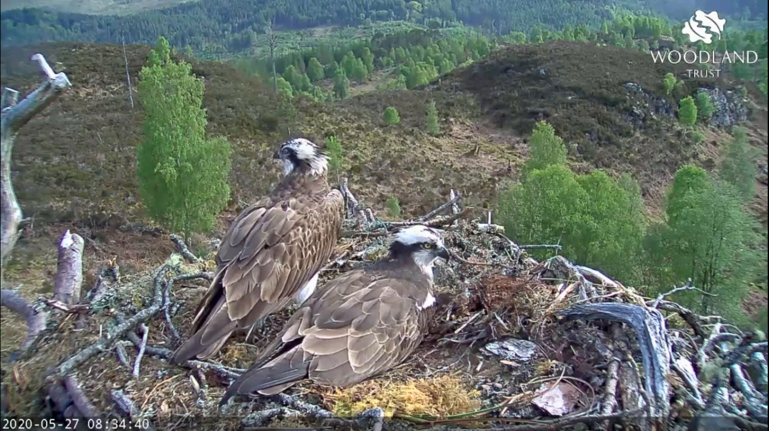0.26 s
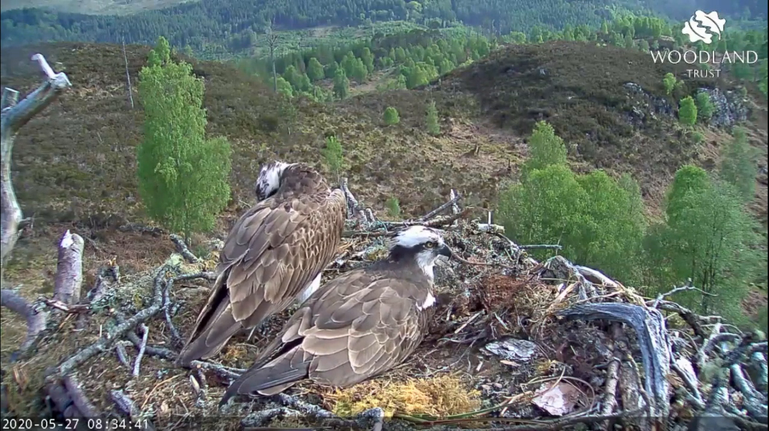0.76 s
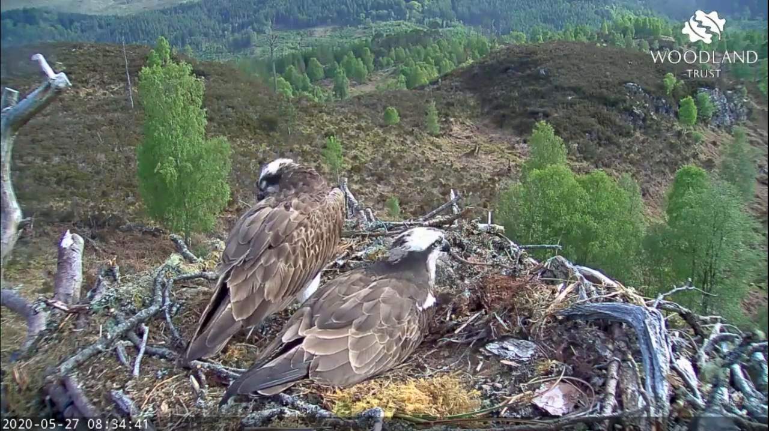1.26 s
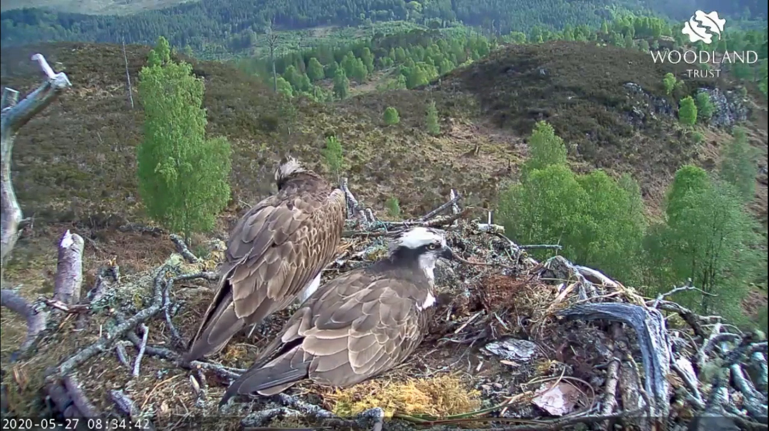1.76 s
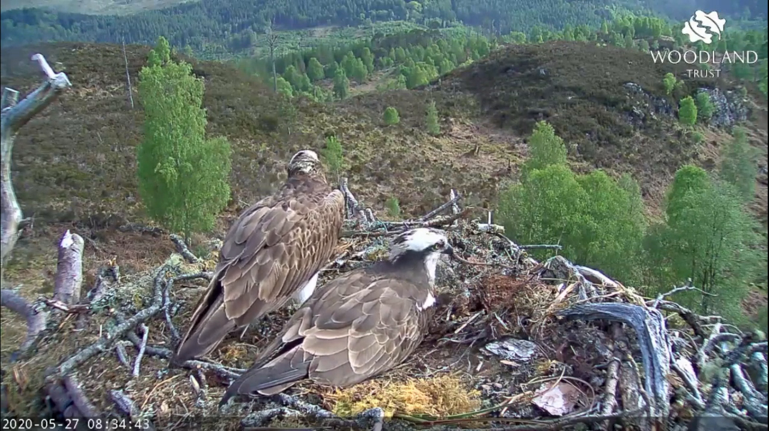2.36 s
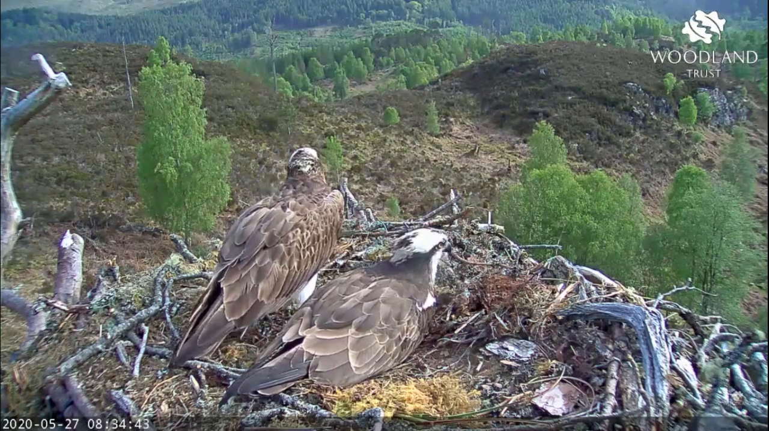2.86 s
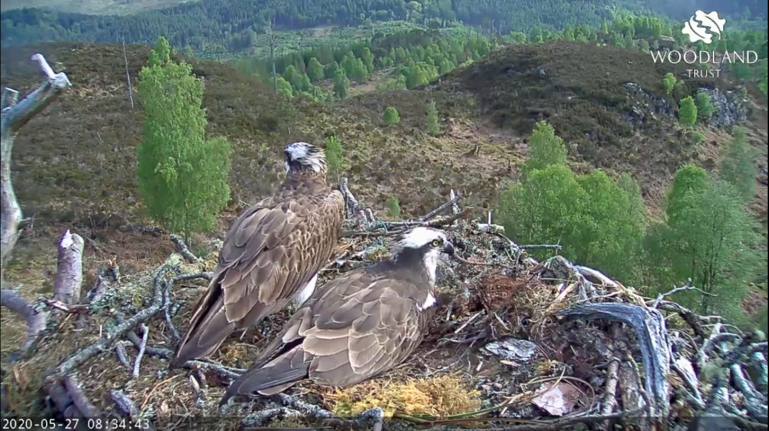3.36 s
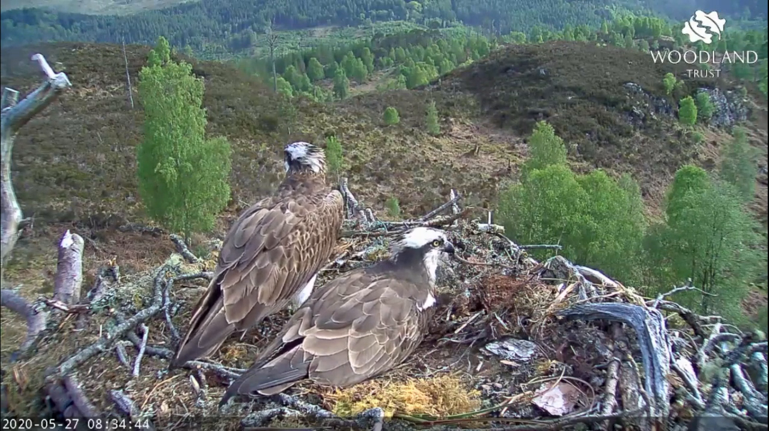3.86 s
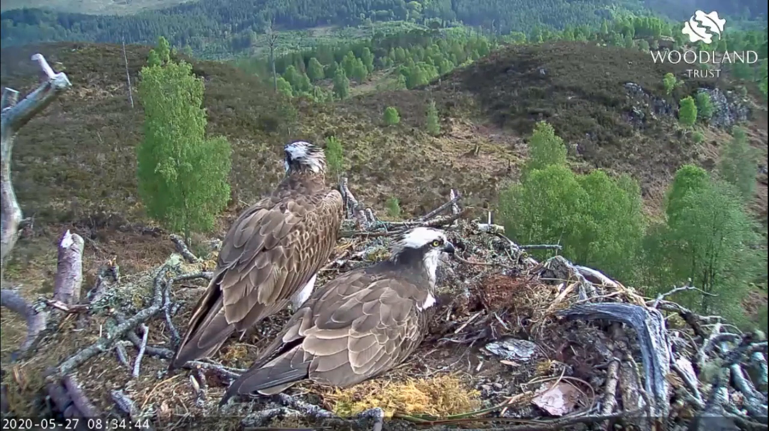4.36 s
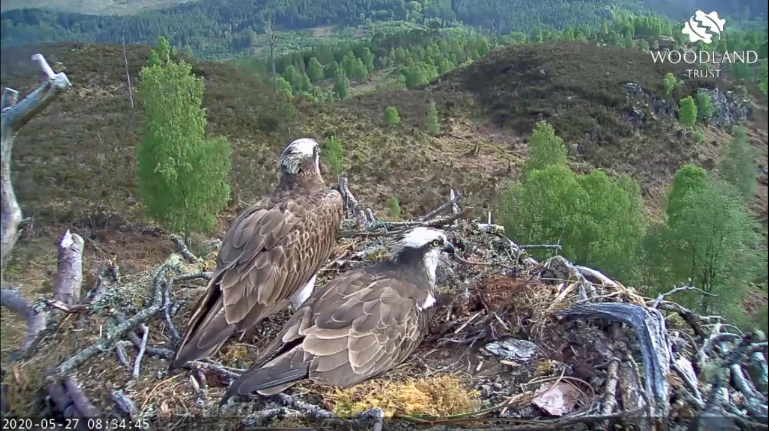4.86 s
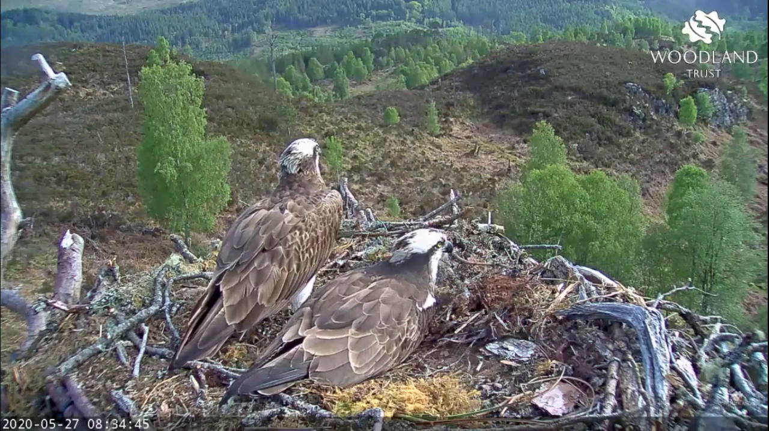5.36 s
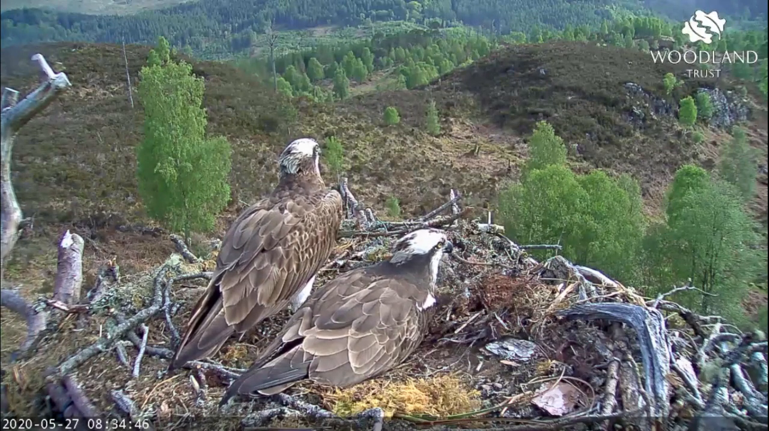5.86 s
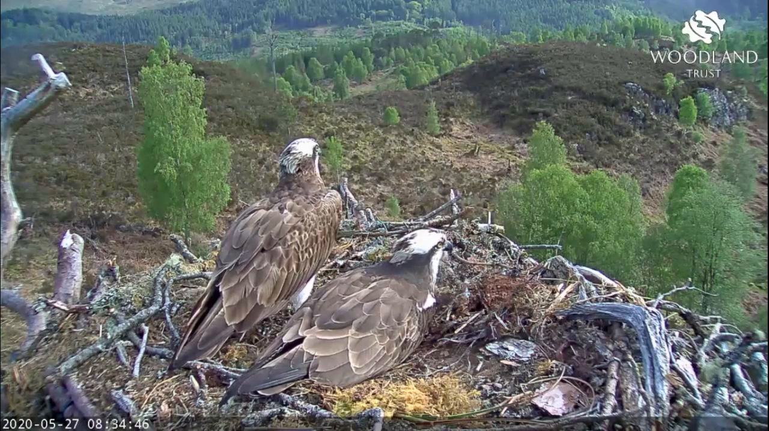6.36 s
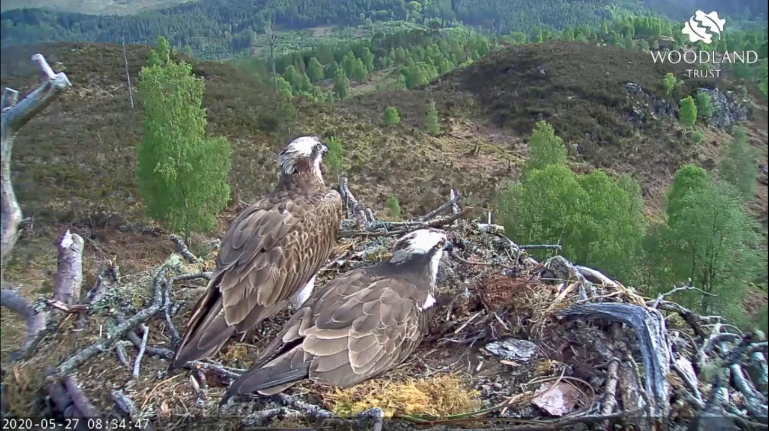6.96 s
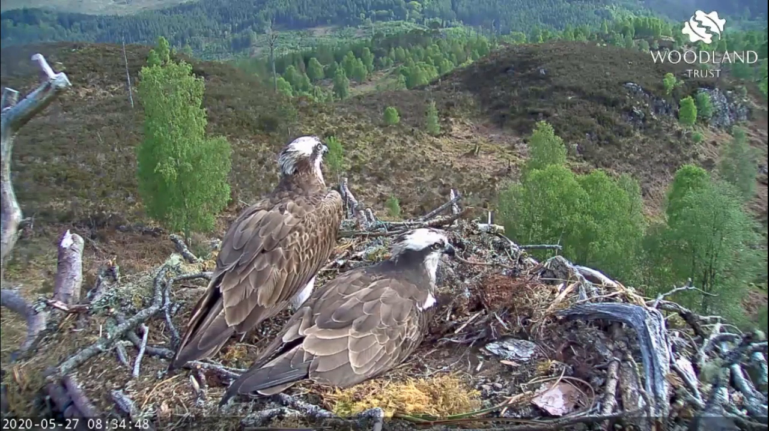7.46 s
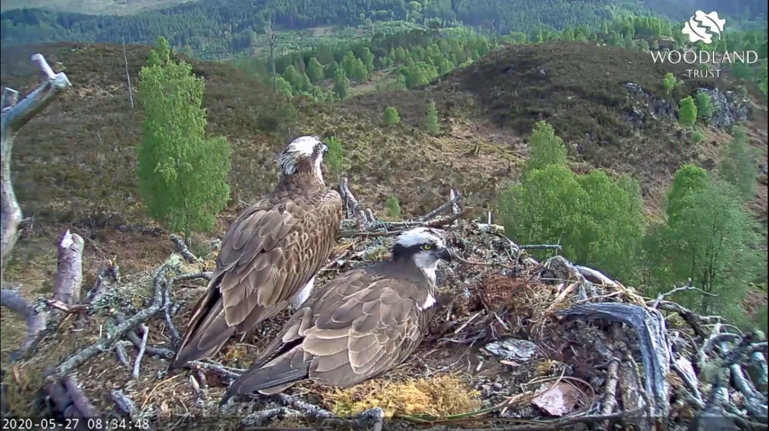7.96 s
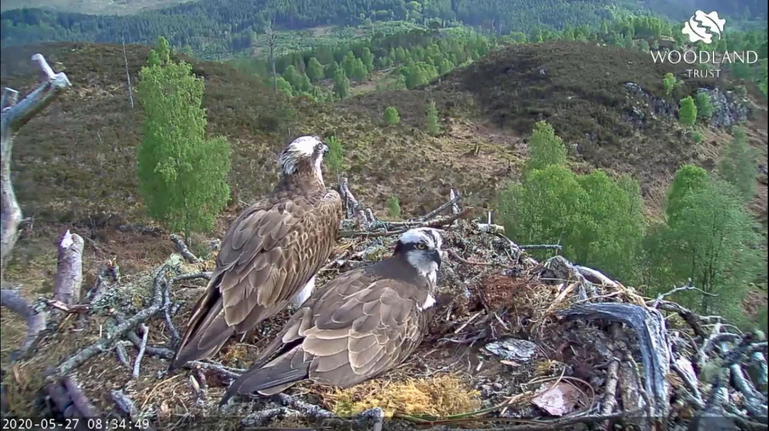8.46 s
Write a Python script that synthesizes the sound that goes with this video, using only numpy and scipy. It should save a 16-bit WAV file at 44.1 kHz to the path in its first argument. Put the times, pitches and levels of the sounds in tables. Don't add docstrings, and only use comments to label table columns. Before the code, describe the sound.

On an exposed hillside nest, a large raptor repeats clear, high piping chirps about five per second, with pauses between runs. Quick, thin songbird notes scatter through distant trees near the start and finish. Wind gently buffets the microphone housing over dull narrow-band hiss and faint steady tones. The feed drops to near silence several times, thumping softly at the edges.

```python
import sys
import numpy as np
from scipy import signal
from scipy.fft import rfft, irfft, next_fast_len
from scipy.io import wavfile
from scipy.ndimage import uniform_filter1d

SR = 44100
rng = np.random.default_rng(int(sys.argv[2]) if len(sys.argv) > 2 else 0)


def volts_from_decibels(level):
    exponent = np.asarray(level, float) / 20
    return 10 ** exponent


def wav_out(sig):
    wavfile.write(sys.argv[1], SR, np.round(np.clip(np.atleast_2d(sig).T, -1, 1) * 32767).astype(np.int16))


N = 384111
TIME = np.arange(N) / SR
JUMP_S, RESUME_S = 1.8822, 1.93


def level(x, db):
    return x * volts_from_decibels(db) / np.sqrt(np.mean(x ** 2))


def gain_at(table, hz):
    f, db = np.transpose(table)
    return volts_from_decibels(np.interp(np.log(hz + 1), np.log(f), db))


def colour(x, table):
    hz = np.arange(len(x) // 2 + 1) * SR / len(x)
    return irfft(rfft(x) * gain_at(table, hz), len(x))


def walk(rate_hz):
    hold = int(SR / rate_hz)
    steps = np.repeat(rng.standard_normal(N // hold + 1), hold)
    slewed = uniform_filter1d(uniform_filter1d(steps, hold), hold)
    return 1.2 * slewed[:N]


def band(hz, width):
    peak = signal.iirpeak(hz, hz / width, fs=SR)
    once = signal.lfilter(*peak, rng.standard_normal(N))
    return level(signal.lfilter(*peak, once), 0)


def tail(x, t60, delay, spread_db):
    t = np.arange(SR // 2) / SR
    size_db = spread_db * rng.exponential(size=len(t)) - 60 * t / t60
    ring = rng.standard_normal(len(t)) * volts_from_decibels(size_db) * (t > delay)
    return signal.fftconvolve(x, ring / np.sqrt(np.sum(ring ** 2)))[:N]


def jump_gate(end_s):
    return 1 - uniform_filter1d(1. * (TIME > JUMP_S) * (TIME < end_s), size=40)


# [f/Hz, level/dB per Hz]
HISS_SPECTRUM = [(100, -31.5), (200, -13.5), (330, -7), (420, -14.5), (500, -21), (900, -24), (2000, -23.5),
                 (4000, -25), (6800, -26), (7300, -30.5)]
# [f/Hz, level/dB rms]
SWITCHING_TONES = [(877.5, -90.5), (1324, -88.5), (1750, -88), (1775, -93.5), (2202, -88.5), (2649, -102.5)]


def electronics():
    tones = np.zeros(N)
    for hz, db in SWITCHING_TONES:
        size = volts_from_decibels(db + 1.2 * walk(10))
        drifting_hz = hz * (1 + .001 * walk(15))
        tones += size * np.sqrt(2) * np.sin(2 * np.pi * np.cumsum(drifting_hz) / SR)
    return level(colour(rng.standard_normal(N), HISS_SPECTRUM), -71.5) + tones


# [t/s, thud level/dB]
GUST_STRENGTH = [(0.0, -51), (.15, -59), (.85, -54.5), (1.18, -57), (1.9, -53.5), (2.26, -63.5),
                 (2.42, -59), (3.2, -61), (3.38, -52), (4.3, -57), (4.6, -62.5), (4.85, -60.5),
                 (6.2, -64.5), (6.98, -51), (7.2, -64.5), (7.5, -59), (8.15, -63), (8.71, -65.5)]
# [f/Hz, level/dB per Hz]
THUD_SPECTRUM = [(15, -2), (30, 3), (60, -5), (80, -15.5), (110, -26.5), (200, -55)]
# [f/Hz, level/dB per Hz]
FLUTTER_SPECTRUM = [(50, -19), (80, 5), (130, -4.5), (200, -11), (280, -13.5), (500, -41.5)]
# [middle t/s, width t/s, level/dB]
FLUTTER_LULLS = [
    (0.2, 0.072, -5),
    (2.25, 0.074, -7),
    (4.55, 0.1, -14),
    (4.68, .04, 3),
    (5.9, .1, -4),
    (8.3, .12, 3),
    (8.6, 0.068, -7),
    (7.3, 0.089, 3),
]


def wind():
    calm_db, flutter_db, follows = -59.5, -71, .8
    gust_db = np.interp(TIME, *np.transpose(GUST_STRENGTH)) + 1.5 * walk(9.0)
    thud = level(colour(rng.standard_normal(N), THUD_SPECTRUM) * volts_from_decibels(2.2 * walk(12)), 0)
    flutter = level(colour(rng.standard_normal(N), FLUTTER_SPECTRUM) * volts_from_decibels(1.9 * walk(15)), 0)
    lull_db = sum(db * np.exp(-((TIME - s) / width) ** 2) for s, width, db in FLUTTER_LULLS)
    flutter_gain = volts_from_decibels(flutter_db + follows * (gust_db - calm_db) + lull_db)
    boom = level(band(hz=332.9, width=39) * volts_from_decibels(1.3 * walk(9.1)), -71.5)
    return volts_from_decibels(gust_db) * thud + flutter_gain * flutter + boom


# [t/s, peak level/dB, f/Hz]
BUFFETS = [(2.075, -59, 334), (2.426, -66, 285), (3.029, -51, 313), (3.233, -54.5, 330),
           (3.421, -45, 101.3), (3.659, -52.5, 324.6), (3.824, -68, 323), (5.36, -55, 336),
           (5.442, -64.5, 334), (5.565, -58.5, 339), (5.635, -60, 320), (5.764, -55, 340),
           (6.934, -47.5, 99), (7.253, -56.5, 108.7), (7.853, -63, 318), (7.997, -69, 330)]


def knocks():
    out = np.zeros(N)
    for s, db, hz in BUFFETS:
        t = np.maximum(TIME - s, 0)
        push = np.e * t / 0.0088 * np.exp(-t / 0.0057)
        out += volts_from_decibels(db) * push * np.sin(2 * np.pi * hz * t)
    return out


def twig():
    t = TIME - 6.938
    decay = (t > 0) * np.exp(-np.abs(t) / .0012)
    return volts_from_decibels(-57) * decay * np.tanh(rng.standard_normal(N))


def strokes(*kinds):
    rows = []
    for table, glide, bow in kinds:
        for s, length, hz, db in table:
            start_hz = hz - (glide / 2 + bow) * length
            end_hz = hz + (glide / 2 - bow) * length
            rows.append((s, length, start_hz, hz, end_hz, db))
    return rows


def notes(table, edge, rough_db, buzz):
    out, jitter = np.zeros(N), walk(900)
    for s, length, start_hz, mid_hz, end_hz, db in table:
        on = (TIME >= s) & (TIME < s + length)
        u = (TIME[on] - s) / length
        hz = np.polyval(np.polyfit([0, 1 / 2, 1], [start_hz, mid_hz, end_hz], 2), u)
        buzzy = (length < .022) * (mid_hz > 5600)
        hz = hz * (1 + buzz * jitter[on] * buzzy)
        swell = np.clip(np.minimum(u, 1 - u) / np.clip(edge, .02, .5), 0, 1)
        out[on] += volts_from_decibels(db) * np.sqrt(2) * swell * np.sin(2 * np.pi * np.cumsum(hz) / SR)
    return out * volts_from_decibels(rough_db * walk(270))


# [t/s, length t/s, middle f/Hz, level/dB]
COOS = [
    (5.82, 0.058, 253.5, -68),
    (5.87, 0.061, 241.5, -66.5),
    (6.02, 0.078, 251, -67),
    (6.08, 0.077, 247, -67.5),
]


def bubbling():
    return notes(strokes((COOS, 760, 180)), edge=0.18, rough_db=3.0, buzz=0)


# [f/Hz, level/dB]
TREE_RESPONSE = [(2500, -6), (3200, -7), (3500, 4), (3700, -6), (3900, 1.5), (4150, -6), (4400, 1.5),
                 (4800, -4.5), (5500, 0), (5850, -3.5), (6150, 2), (6500, -7), (7000, -7)]


def through_trees(table):
    song = notes(table, edge=.25, rough_db=3.2, buzz=.035)
    slaps = volts_from_decibels(-5) * tail(song, t60=0.075, delay=0.003, spread_db=4)
    echo = volts_from_decibels(-8.5) * tail(song, t60=0.36, delay=0.02, spread_db=1.8) * volts_from_decibels(4 * walk(90))
    return colour(song + slaps + echo, TREE_RESPONSE) + volts_from_decibels(-16) * song


# [t/s, length t/s, middle f/Hz, level/dB]
TICKS = [(.872, 0.0085, 6120, -65.5), (.98, 0.0078, 6080, -54.5), (1.09, 0.0093, 6100, -61),
         (1.124, 0.0086, 6470, -50.5), (1.137, .007, 6400, -58.5), (1.158, .008, 6490, -49),
         (1.176, 0.013, 6280, -55), (1.191, 0.01, 6150, -50), (1.792, 0.006, 6150, -58),
         (1.829, 0.007, 6350, -54.5), (1.864, .007, 6300, -50), (1.13, 0.01, 6100, -59.5)]
FLICKS = [(.941, 0.012, 4420, -67.5), (.987, .011, 4520, -68), (1.162, .012, 4680, -62),
          (1.19, 0.012, 4680, -66), (.74, .01, 4290, -63), (.8, .01, 4510, -60), (.84, .01, 4560, -63.5),
          (1.2, .008, 5510, -60.5), (1.175, .012, 5960, -60.5), (8.155, .012, 3120, -64),
          (8.348, .012, 4100, -54.5), (8.592, 0.014, 3530, -60), (8.687, 0.011, 3700, -62)]
SLIDES = [
    (.332, .035, 5570, -75.5),
    (.499, .062, 5150, -70.5),
    (.659, .065, 5420, -70.5),
    (.995, 0.066, 5420, -72),
    (1.966, 0.039, 6030, -70),
    (2.062, .026, 4430, -57),
    (2.122, .04, 6000, -71),
    (2.198, .018, 4650, -61.5),
    (8.208, .028, 3897, -53.5),
]
STEPS = [(.734, .018, 4060, -66), (.791, .017, 4470, -59), (.835, 0.016, 4600, -63.5),
         (1.227, 0.018, 4430, -70), (1.245, 0.018, 5920, -69), (1.268, 0.015, 5500, -72.5),
         (1.165, .02, 5500, -66), (1.002, .024, 6400, -70), ]
DROOPS = [(6.99, .035, 5000, -81), (7.102, 0.076, 5430, -81.5), (7.104, 0.04, 3220, -81.5),
          (7.257, .1, 4980, -79), (7.43, 0.056, 4910, -79), (8.123, 0.01, 3490, -49),
          (8.149, 0.009, 3465, -47.5), (8.609, 0.038, 3040, -67.5), (2.283, 0.032, 4656, -73),
          (8.055, 0.015, 3507, -64.5), (8.232, .022, 3100, -68)]
HOLDS = [(.775, 0.02, 6150, -65), (.898, 0.033, 5130, -70), (1.876, 0.017, 4070, -46),
         (2.1, 0.027, 5100, -72), (1.925, 0.032, 4240, -61.5), (2.3, 0.084, 3870, -74),
         (2.116, 0.016, 5500, -65.5), (2.152, 0.027, 3200, -76), (2.21, 0.021, 4305, -58.5),
         (1.228, .015, 6040, -57), (2.23, .05, 3530, -84), (2.296, 0.051, 3600, -82),
         (2.136, 0.0072, 5480, -65), (4.87, 0.085, 3960, -88), (4.757, 0.095, 4280, -81),
         (6.828, 0.067, 4250, -77), (7.459, 0.03, 4320, -72.5), (8.132, 0.012, 3930, -51.5),
         (8.17, 0.027, 3560, -61), (8.323, 0.066, 2810, -74), (8.357, 0.0095, 3910, -54.5),
         (8.226, 0.013, 3550, -45.5), (2.08, 0.0098, 3860, -55.5)]
LIFTS = [(.765, 0.017, 5790, -65.5), (.79, .014, 6170, -73), (.947, .041, 4140, -71.5),
         (1.998, 0.06, 5600, -70.5), (2.16, .06, 5630, -74.5), (2.506, 0.058, 3480, -84),
         (7.266, .03, 3900, -79.5), (7.49, 0.032, 5900, -75), (7.619, .025, 4740, -68.5),
         (7.765, 0.09, 3450, -71.5), (7.83, .025, 3900, -71), (7.96, .07, 3464, -69.5),
         (8.175, .012, 4080, -75.5), (8.452, .022, 3400, -67), (8.1, .014, 3250, -54.5),
         (1.955, 0.031, 4425, -50.5)]
SAGS = [
    (5.703, .09, 4290, -80.5),
    (6.29, .05, 4370, -79),
    (2.31, 0.05, 4420, -75.5),
]
WHIPS = [
    (.724, 0.023, 4200, -67.5),
    (1.897, 0.015, 4314, -48),
    (1.908, .012, 4855, -58.5),
    (8.112, 0.011, 3520, -55),
    (8.138, 0.021, 4160, -55),
    (8.178, .01, 4100, -63),
    (.872, .012, 6170, -65.5),
    (8.532, 0.015, 3130, -63.5),
]
JABS = [
    (.782, .009, 4600, -58),
    (.877, .007, 4600, -57),
    (.888, .007, 4700, -58),
    (8.312, .007, 4450, -56),
    (8.596, .009, 3400, -62),
    (8.142, .007, 4150, -58),
]
FURTHER_HOLDS = [
    (1.886, .02, 4050, -59),
    (1.92, .025, 5120, -74),
    (1.983, .015, 4850, -71),
    (2.413, .07, 5430, -72),
    (2.235, .05, 4330, -74),
    (2.14, .04, 4000, -77),
]
HOOKS = [
    (8.264, .038, 4550, -53),
    (8.403, .04, 4230, -54.5),
    (8.547, 0.033, 4234, -58.5),
    (8.641, 0.028, 4040, -65),
]
ARCHES = [
    (.868, 0.016, 6210, -68),
    (7.661, 0.057, 4110, -70.5),
    (7.845, 0.04, 4255, -68),
    (8.023, 0.041, 4000, -67),
]
DIVES = [
    (8.474, 0.038, 3890, -61),
    (.829, .034, 6450, -69),
    (8.497, .012, 3300, -60),
]
# [strokes, glide f/Hz per s, bow of the middle above a straight glide f/Hz per s of length]
KINDS = [(TICKS, -170000, -12000), (FLICKS, -95000, -5000), (SLIDES, -48000, -6000), (STEPS, -48000, -1500),
         (DROOPS, -20000, -1500), (HOLDS, -2000, 0), (LIFTS, 6100, 1000), (SAGS, -3500, -300),
         (WHIPS, 41000, 13000), (JABS, 95000, 3000), (FURTHER_HOLDS, -2200, -300), (HOOKS, 44000, 20000),
         (ARCHES, -14000, 17000), (DIVES, -40000, 4000)]


def songbird():
    sung = strokes(*KINDS)
    split_s = JUMP_S + .005
    earlier = [n for n in sung if n[0] + n[1] < split_s]
    later = [n for n in sung if n[0] + n[1] >= split_s]
    until_jump = jump_gate(N)
    return until_jump * through_trees(earlier) + (1 - until_jump) * through_trees(later)


# [t/s, length t/s, top f/Hz, arch depth f/Hz, effort level/dB]
CHIRPS = [(0.491, 0.036, 2174, 48.26, -35), (0.6833, 0.043, 2232, 28.15, -30),
          (0.899, 0.046, 2274, 82, -28.5), (1.111, 0.048, 2335, 72.5, -29),
          (1.825, 0.066, 2450, 205.2, -33.5), (1.936, 0.069, 2474, 205.6, -28.5),
          (2.866, 0.078, 2216, 114.2, -38), (3.068, 0.076, 2402, 266, -29),
          (3.2705, 0.069, 2414, 201.8, -28.5), (3.481, 0.073, 2347, 178.7, -28.5),
          (3.6934, 0.075, 2414, 307, -28), (5.0148, 0.07, 2284, 142, -32), (5.2087, 0.062, 2411, 187, -30),
          (5.3975, 0.068, 2376, 188.5, -31.5), (5.5975, 0.073, 2429, 233, -32),
          (5.799, 0.0821, 2442, 240.4, -32.5), (6.0023, 0.084, 2510, 282, -31.5),
          (6.218, 0.08, 2535, 258, -32), (7.5667, 0.062, 2189, 24.4, -33),
          (7.777, 0.061, 2309, 131.3, -26.5), (7.9764, 0.061, 2310, 167.4, -26),
          (8.1836, 0.06, 2328, 158.7, -22.5), (8.407, 0.062, 2333, 174, -24.5)]
# [from t/s, second partial level/dB, third level/dB, half-step level/dB, end above start f/Hz]
HEAD_TURNS = [
    (0.4, -0.5, 3.5, -16, -11.5),
    (1.8, 2, -3.5, -18, -20),
    (2.8, 3, 8.5, -11, 60),
    (3.0, -2, -2, -19.5, 62),
    (3.2, 0, 1, 2.5, 34.5),
    (3.6, -2, 0.5, -4, 41.5),
    (4.9, 1, -1, -16, 48.5),
    (5.1, -3.5, -3, -14, -19.5),
    (7.5, -1.5, 3, -9, 61.5),
    (7.7, 0.5, 2.5, -12, -4.5),
]
# [stick echo level/dB, extra climb f/Hz, second partial level/dB]
HEAD_FACING = [(-5, 1.5, -2), (-8.5, 1.45, 3.5), (6.5, -20.5, 2.2), (-9.5, -12, 1), (1.5, 1.2, -4),
               (-12, -21, -0.5), (-3, -0.8, -1), (-14.5, 12.5, -0.6), (-10.5, 1.7, -3), (-11, -20.5, -0.5),
               (-2, 1.2, 1.5), (-9, -1.5, 0.5), (-14.5, -3.5, 1), (-13.5, -1.5, -3), (-6, -1.5, .1),
               (8.5, 0.7, -2), (-4.5, 1.5, 1), (-1, -29, 0.5), (-4.5, 0.5, 0.5), (-12, 1.5, 0.5),
               (-5, 5.5, 1.3), (0.5, -19.5, -2.5), (-9, -10, -1.3)]
BEAK_OPENING = [0, -3, -1, .1, 6, 0.5, -3, 1, .1, 1, -0.5, -10, 0, 1, 2.5, 5, 1.5, 0, 0.5, .1, -5, 0.5, -1]
# [attack t/s, release t/s, rise level/dB, middle swell level/dB, swing back 0-1]
BREATH_PUFFS = [(.014, 0.023, -1, 2, .05), (.013, .024, -2.5, 2, .05), (.012, .022, -1, .4, .05),
                (.015, .018, 2.5, 0.3, .1), (.014, 0.02, -1, 1.5, .1), (.014, .019, -0.5, 1.5, .1),
                (.014, 0.017, -0.2, 2, .05), (.014, .018, 0.5, 0.7, .15), (.014, .019, -0.2, 0.5, .13),
                (.014, .019, 1.2, 0.5, .12), (.014, .018, 1.5, -0.5, .15), (.016, 0.023, -2, 3.5, .05),
                (.014, .018, 1.5, 0, .15), (.014, 0.016, 1.5, 1.5, .13), (.014, .019, -0.8, .3, .1),
                (.014, .021, -1.5, 0, .1), (.014, .019, -1.5, 1, .1), (.014, 0.018, -2, 1.7, .1),
                (.014, .019, 0, 2.5, .1), (.014, 0.022, 1, 1.2, .1), (.014, .019, .3, .3, .1),
                (.014, .019, 2.5, -1.8, .1), (.014, 0.021, 2, 0, .1)]
# [second's middle swell level/dB, third level/dB, third's rise level/dB, pitch top 0-1]
BEAK_OVERTONES = [(.3, 1.2, 0.5, .49), (.3, -2.5, 0, .49), (1.1, 0.7, 0.5, 0.6), (-0.2, -2.5, -5, 0.4),
                  (9, -3.5, .3, .49), (-2, -1, -4, .49), (.3, 0, 0, .49), (.3, 0.5, -0.5, .49),
                  (-0.5, -0.5, 0.5, .49), (.3, .3, 1, .49), (-2.5, -0.3, .3, 0.5), (5, .3, 4, .49),
                  (-1.5, 0.5, -1, 0.43), (3, -0.5, .3, .48), (.3, .3, -3, 0.52), (2, -0.8, 2, .48),
                  (-6, -0.5, -6, 0.54), (2, -0.5, -4, .52), (1, .3, .3, .49), (1.5, .3, -2, 0.48),
                  (1, -0.5, -0.7, 0.52), (6, .3, -3.5, 0.47), (-1.5, -0.5, -3, 0.46)]
# [f/Hz, level/dB]
FIRST_RESPONSE = [(2150, 0.5), (2230, -0.5), (2300, -1.3), (2350, 1.6), (2390, 1.5), (2430, 0.3),
                  (2470, -4), (2530, -0.5)]
# [f/Hz, level/dB]
SECOND_RESPONSE = [(4250, -19), (4340, -14.5), (4400, -33), (4480, -24), (4600, -27), (4700, -25),
                   (4820, -22.5), (4920, -28.5), (5060, -23.5)]
# [f/Hz, level/dB]
THIRD_RESPONSE = [(6400, -46.5), (6600, -41.5), (6800, -30.5), (7000, -30), (7150, -30), (7300, -40.5),
                  (7600, -46)]
# [f/Hz, level/dB]
HALF_RESPONSE = [(3200, -48.5), (3450, -52.5), (3550, -40), (3650, -55), (3800, -62)]


def raptor():
    ring_hz, ring_width_hz, lead_s = 2366.2, 85, 0.0019
    rebound_s = 0.0096
    hz, push = np.full(N, 2200.), np.zeros((4, N))
    swell, send, back = np.zeros((3, N))
    chirps = zip(CHIRPS, HEAD_FACING, BEAK_OPENING, BREATH_PUFFS, BEAK_OVERTONES)
    for (s, length, top_hz, depth_hz, db), facing, rise_db, puff, beak in chirps:
        echo_db, more_hz, second_db = facing
        attack, release, lean_db, belly_db, swing = puff
        bow_db, third_db, third_rise_db, crest = beak
        _, *extra_db, climb_hz = [turn for turn in HEAD_TURNS if turn[0] < s][-1]
        on = (TIME >= s - lead_s) & (TIME < s - lead_s + length)
        t = TIME[on] - s + lead_s
        u = t / length
        tilt = u - 1 / 2
        belly = np.sin(np.pi * u) ** 2 - 1 / 2

        arch = 1 - np.sin(np.pi * np.interp(u, [0, crest, 1], [0, 1 / 2, 1]))
        pitch = top_hz + (climb_hz + more_hz) * tilt - depth_hz * arch
        floor_hz = top_hz - 180
        hz[on] = floor_hz + 15 * np.logaddexp(0, (pitch - floor_hz) / 15)

        ramp = np.minimum(t / attack, (length - t) / release)
        swell[on] = np.sin(np.pi / 2 * np.clip(ramp, 0, 1))
        push[:, on] = volts_from_decibels(db + np.r_[0, extra_db] + [0, second_db, 0, 0])[:, None]
        push[0, on] *= volts_from_decibels(lean_db * tilt + belly_db * belly)
        push[1, on] *= volts_from_decibels(rise_db * tilt + bow_db * belly)
        push[2, on] *= volts_from_decibels(third_db + third_rise_db * tilt)
        push[3, on] *= volts_from_decibels(21 * tilt)
        back[on] = swing * np.sin(np.pi * np.clip((length - t) / rebound_s, 0, 1)) ** 2
        send[on] = volts_from_decibels(echo_db)

    hz = uniform_filter1d(hz, size=90)
    phase = 2 * np.pi * np.cumsum(hz * (1 + 0.001 * walk(110))) / SR
    partials = ((1, FIRST_RESPONSE, .3, 1.9), (2, SECOND_RESPONSE, 3.5, 3.5),
                (3, THIRD_RESPONSE, 1.5, 5.5), (3 / 2, HALF_RESPONSE, 2.5, 6.5))
    waves = []
    for gain, (k, table, wobble_db, power) in zip(push, partials):
        envelope = gain * (swell ** power - back * (k == 1))
        response = uniform_filter1d(gain_at(table, k * hz), size=220)
        waves.append(envelope * response * volts_from_decibels(wobble_db * walk(120)) * np.sin(k * phase))
    first, *upper = waves
    mode = signal.iirpeak(ring_hz, ring_hz / ring_width_hz, fs=SR)
    voice = signal.lfilter(*mode, first) + np.roll(sum(upper), int(lead_s * SR))
    rasp = volts_from_decibels(-50 + 2.3 * walk(90)) * band(hz=2900, width=90)
    voice = voice + push[0] * swell ** 5.1 * rasp

    sticks = volts_from_decibels(-33.0 + 4.9 * walk(160)) * tail(voice * send, t60=0.18, delay=.03, spread_db=3)
    faint_tail = volts_from_decibels(-50.5 + 4.0 * walk(120)) * tail(voice, t60=0.86, delay=0.069, spread_db=4.0)
    return voice + sticks + faint_tail


def scene():
    background = electronics() + wind() + knocks() + twig()
    birds = bubbling() + songbird() + jump_gate(RESUME_S) * raptor()
    return (background + birds)[None]


# [from t/s, to t/s]
DROPOUTS = [
    (1.2062, 1.2262),
    (1.2902, 1.7822),
    (4.0223, 4.0573),
    (4.2193, 4.2493),
    (6.3325, 6.8396),
]


def link():
    live = np.ones(N)
    for start, end in DROPOUTS:
        live[(TIME >= start) & (TIME < end)] = 0
    return live


def offset_thumps(dry, live):
    offset, drain_hz = 0.01, 1.87
    stream = (dry + offset) * live - offset
    pole = np.exp(-2 * np.pi * drain_hz / SR)
    return signal.sosfilt([1, -2, 1, 1, -2 * pole, pole ** 2], stream)


# [f/Hz, level/dB]
TOP_EDGE = [(7000, 0.5), (7300, -5.5), (7500, -9), (7700, -19), (7900, -59.5), (8300, -91.5)]


def low_rate(stream):
    padded = np.pad(stream[0], (0, next_fast_len(N + SR) - N))
    return colour(padded, TOP_EDGE)[None, :N]


# [f/Hz, level/dB per Hz]
MURMUR_SPECTRUM = [(60, -4.5), (190, 1.5), (300, -12), (1000, -22.5), (3000, -40.5)]


def murmur():
    return level(colour(rng.standard_normal(N), MURMUR_SPECTRUM), -101)


def low_pass(x):
    return signal.sosfilt(signal.butter(12, 15700, fs=SR, output="sos"), x)


def record(dry):
    live = link()
    stream = low_rate(offset_thumps(dry, live)) + murmur()
    live_noise = volts_from_decibels(-96.5) * live * rng.standard_normal(dry.shape)
    return low_pass(stream + live_noise)


dry = scene()
out = record(dry)
wav_out(out)
```